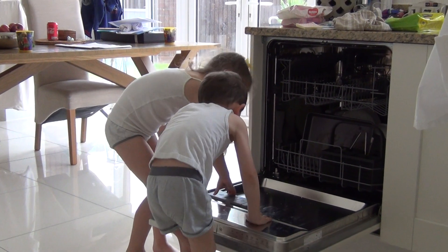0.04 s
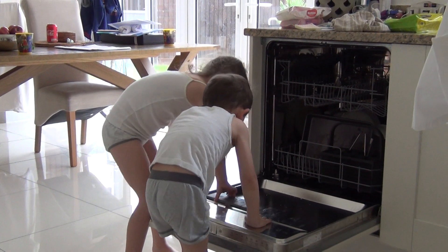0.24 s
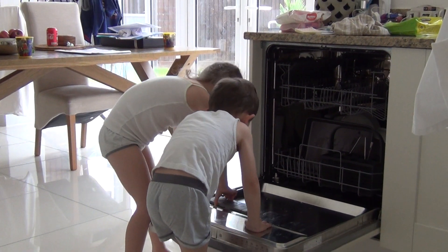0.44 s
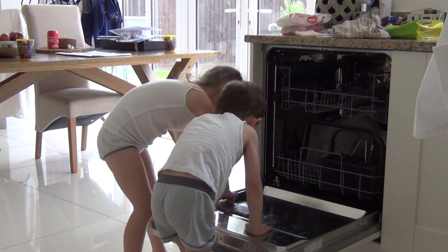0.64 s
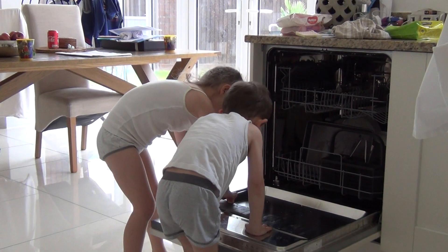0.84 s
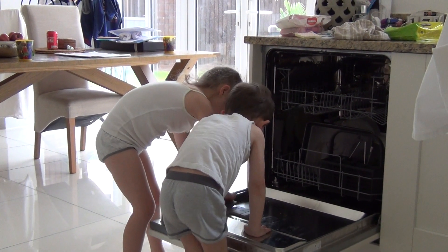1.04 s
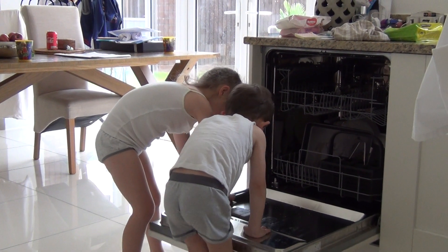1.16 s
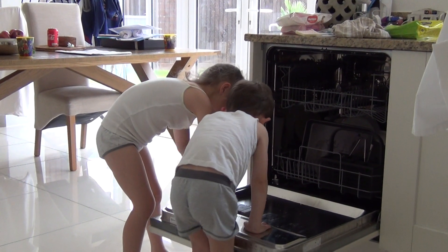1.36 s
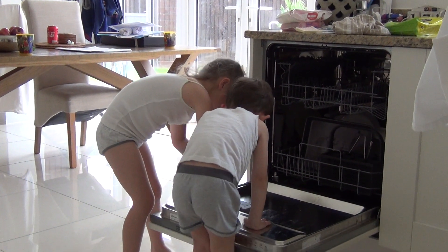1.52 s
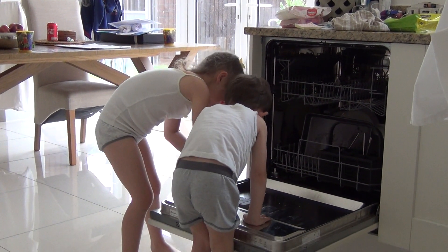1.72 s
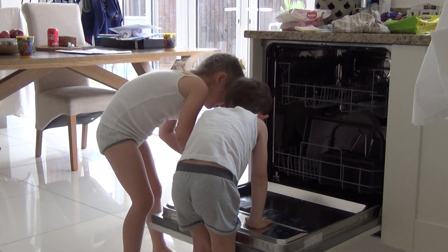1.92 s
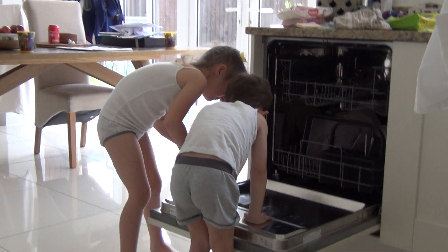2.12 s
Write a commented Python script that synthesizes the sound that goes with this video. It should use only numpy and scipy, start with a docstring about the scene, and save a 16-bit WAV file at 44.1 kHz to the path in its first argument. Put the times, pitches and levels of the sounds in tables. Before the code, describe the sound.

A plastic detergent flap clicks and snaps on an open dishwasher door. A faint hand scuff and soft knocks come first, with a light clink at 0.2 seconds. After a pause, hollow knocks and a click sound around 1.1 seconds, and a sharper click at 1.4. Soft knocks follow near 1.7. Just before 2 seconds, a loud clack rings the steel panel, echoing briefly in the quiet kitchen.

```python
"""A brief hand scuff, soft knocks, faint ticks and a light clink sound over quiet kitchen noise.
After a pause, hands at the detergent flap knock the hollow, open dishwasher door, and the plastic
catch clicks twice as it slips over its edge. Last, the flap snaps against its stop with a loud clack
that rings the steel panel. Each contact is a burst of noise coloured by the struck part; ringing
parts add decaying sine modes, and the tiled room reverberates."""
import sys
import numpy as np
from scipy import signal
from scipy.fft import rfft, irfft
from scipy.io import wavfile
from scipy.ndimage import uniform_filter1d

SR = 44100
rng = np.random.default_rng(int(sys.argv[2]) if len(sys.argv) > 2 else 0)


def materialize(psi):
    """Save the field psi as 16-bit PCM at rate SR to the path in sys.argv[1].

    A 1-D psi becomes a single channel; in a 2-D psi each row is a channel.
    """
    bounded = np.clip(np.atleast_2d(psi).T, -1, 1)
    quanta = np.round(bounded * 32767).astype(np.int16)
    wavfile.write(sys.argv[1], SR, quanta)


N = 96314
T = np.arange(N) / SR
F = np.maximum(np.arange(N + 1) * SR / (2 * N), 1)  # Hz, bins of a 2N-point FFT
OCTAVES = np.log2(F / 1000)  # re 1 kHz


def amp(db):
    """Decibels to gain."""
    return 10 ** (np.asarray(db) / 20)


def curve(points):
    """Rows of (f/Hz, value) interpolated over log frequency."""
    hz, value = np.array(points, float).T
    return np.interp(np.log(F), np.log(hz), value)


def resonances(peaks):
    """Bell-shaped peaks and dips in dB from rows of (f/Hz, width/Hz, gain/dB)."""
    return sum(db * .5 ** ((2 * (F - hz) / width_hz) ** 2) for hz, width_hz, db in peaks)


def colour(x, gain_db):
    """Minimum-phase filter, built by folding the cepstrum."""
    cepstrum = irfft(gain_db * np.log(10) / 20)
    cepstrum[1:N] *= 2
    cepstrum[N + 1:] = 0
    return irfft(rfft(x, 2 * N) * np.exp(rfft(cepstrum)))[..., :N]


def unit(x):
    """Scale to unit energy."""
    return x / np.sqrt(np.sum(x ** 2))


def noise(gain_db):
    """Steady coloured noise, rms 1."""
    return unit(colour(rng.standard_normal(N), gain_db)) * np.sqrt(N)


def fade(t60_s, t=T):
    """Exponential decay."""
    return np.exp(-np.log(1000) * t / t60_s)


def place(x, start_s, db):
    """Start a sound at start_s with the energy of 20 ms at level db."""
    return np.pad(unit(x), (int(start_s * SR), 0))[:N] * amp(db) * np.sqrt(.02 * SR)


def scatter(envelope):
    """Dense random vibration, alternately whitened and fitted to its envelope."""
    x = rng.standard_normal(N) * envelope
    for _ in range(4):
        spectrum = rfft(x)
        bin_power = np.abs(uniform_filter1d(np.abs(spectrum) ** 2, size=61))
        x = irfft(spectrum / np.sqrt(bin_power + 1e-12), N)
        local_power = np.abs(uniform_filter1d(x ** 2, size=301))
        x = x * envelope / np.sqrt(local_power + 1e-14)
    return unit(x)


def contact(shape_db, t60_s, rise_s, hold_s=0):
    """Burst of contact chatter, coloured by the struck part."""
    envelope = (1 - np.exp(-T / rise_s)) * fade(t60_s, np.maximum(T - hold_s, 0))
    return colour(scatter(envelope), shape_db)


def ring(modes, tilt_db_per_oct=0, damping=1, rise_s=0.0034):
    """Decaying modes of a struck part, in random phase."""
    ringing = np.zeros(N)
    for hz, db, t60_s in modes:
        gain = amp(db + tilt_db_per_oct * np.log2(hz / 1000))
        ringing += gain * fade(t60_s / damping) * np.sin(2 * np.pi * (hz * T + rng.random()))
    return (1 - np.exp(-T / rise_s)) * ringing


# stereo width: f/Hz, side gain/dB
SIDE_GAIN = [(50, 1.5), (150, -19.5), (800, -21.5), (2800, -18.5), (5500, -12.5), (9000, -6.5),
             (13000, -47)]

def stereo(mid, twin):
    """Left and right from a sound and a filtered, uncorrelated twin."""
    side = colour(twin, curve(SIDE_GAIN))
    return np.array([mid + side, mid - side])


# room noise spectrum: f/Hz, relative level/dB
AIR_SPECTRUM = [(25, -16.5), (60, -13), (120, -8.5), (240, -1.5), (320, -3.5), (480, -3.5), (800, -8.5),
                (1500, -13.5), (2500, -20.5), (3100, -27), (6400, -26.5), (8500, -32), (9700, -37),
                (10600, -30), (18000, -36)]
# steady tones: f/Hz, rms level/dB
HUM_TONES = [(100, -78.5), (452, -83), (2519, -83.5)]

def background(air_db=-62, whine_hz=15460, whine_db=-79):
    """Quiet room noise with a faint hum and a thin, wavering whine."""
    air = stereo(noise(curve(AIR_SPECTRUM)), noise(curve(AIR_SPECTRUM))) * amp(air_db)
    hum = sum(amp(db) * np.sin(2 * np.pi * hz * T) for hz, db in HUM_TONES)
    waver = 1 + .35 * noise(-20 * np.log10(1 + (F / 70) ** 2))  # mostly below 70 Hz
    whine = amp(whine_db) * waver * np.sin(2 * np.pi * whine_hz * T)
    return air + np.sqrt(2) * (hum + whine)


# kitchen reverberation: f/Hz, t60/s
ROOM_DECAY = [(120, 0.37), (400, 0.5), (1000, 0.47), (2200, 0.52), (4500, 0.46), (8000, 0.35),
              (12000, 0.24), (17000, 0.24)]

def room_tail(gap_s=0.0023, build_s=0.0027):
    """Diffuse echoes off tiles and cupboards; the treble dies first."""
    hz, t60s = np.array(ROOM_DECAY).T
    build_up = 1 - np.exp(-np.maximum(T - gap_s, 0) / build_s)
    spectrum = rfft(scatter(fade(t60s.max()) * build_up), 2 * N)
    tail = np.zeros(N)
    for weights, t60_s in zip(np.eye(len(hz)), t60s):
        band = irfft(spectrum * np.interp(np.log(F), np.log(hz), weights))[:N]
        tail += band * fade(t60_s) / fade(t60s.max())
    return tail


def kitchen(direct, room_db):
    """Direct sound plus stereo reverberation."""
    echoes = signal.fftconvolve(stereo(room_tail(), room_tail()), direct[None], axes=1)[:, :N]
    return direct + amp(room_db) * echoes


# hand friction spectrum: f/Hz, relative level/dB
SCUFF_SPECTRUM = [(150, -2.5), (600, -6), (1300, -1), (2500, -7.5), (3700, -3.5), (4600, -0.5),
                  (5600, -10.5), (9000, -13), (17000, -21)]

def scuff(level_db=-58, stop_s=0.027, tau_s=0.065):
    """A hand slides briefly along the door; the sound dies away."""
    envelope = amp(level_db) * np.exp(-np.maximum(T - stop_s, 0) / tau_s)
    return envelope * stereo(noise(curve(SCUFF_SPECTRUM)), noise(curve(SCUFF_SPECTRUM)))


# faint ticks: t/s, level/dB
TICK_HITS = [(0.053, -65), (0.0579, -61), (.159, -67), (.171, -73), (1.347, -74.5), (2.0699, -50)]
# tick spectrum: f/Hz, relative level/dB
TICK_SPECTRUM = [(500, 4), (4000, -12), (8000, -4.5), (12000, -10), (18000, -28)]

def ticks():
    """Faint, short contacts in the room."""
    bursts = sum(place(contact(curve(TICK_SPECTRUM), t60_s=0.033, rise_s=0.00055), start_s, db)
                 for start_s, db in TICK_HITS)
    return kitchen(bursts, room_db=-4)


# clink contact spectrum: f/Hz, relative level/dB
CLINK_SPECTRUM = [(500, -27), (2100, -14), (2800, 1), (3700, 2), (4400, -9.5), (6000, -20), (8500, -11),
                  (11000, -25), (18000, -34)]
# clink modes: f/Hz, relative level/dB, t60/s
CLINK_RING = [(2600, -9, 0.65), (2910, -17, .45), (3130, -16, .3), (3400, -3, 0.27), (3450, -9, 0.26),
              (3590, 4, .25), (3850, -5, 0.24)]

def clink(start_s=.2095):
    """A light contact that rings in a narrow treble band."""
    tap = place(contact(curve(CLINK_SPECTRUM), t60_s=0.063, rise_s=0.0002), start_s, db=-53)
    return kitchen(tap, room_db=-1.5) + place(ring(CLINK_RING), start_s, db=-59)


# snick spectrum: f/Hz, relative level/dB
SNICK_SPECTRUM = [(200, -16), (800, -8), (1400, 8.5), (2200, 3), (3500, -3.5), (8000, -11.5), (11500, 1),
                  (14500, 0), (18000, -11)]

def snick():
    """One sharp, close contact without reverberation."""
    return place(contact(curve(SNICK_SPECTRUM), t60_s=0.0017, rise_s=.00005), start_s=1.8294, db=-49)


# knocks: t/s, level/dB, tilt/(dB/oct), shelf above 3 kHz/dB
KNOCK_HITS = [(0.051, -60.5, -2.5, 10), (0.075, -70, -6, -2), (1.118, -52.5, 1, 5), (1.1227, -43.5, 0, -6),
              (1.139, -41.5, 1, -30), (1.7207, -51.5, 3, 3.5), (1.730, -51, 0, 0.5), (1.941, -53.5, 2, 4)]
# knock spectrum: f/Hz, relative level/dB
KNOCK_SPECTRUM = [(60, -10.5), (130, -4.5), (250, 4.5), (420, -12.5), (600, -0.5), (850, -5.5),
                  (1200, -6.5), (1750, -8), (2600, -16.5), (8000, -30), (12000, -35.5), (17000, -54)]
# hollow door resonances: f/Hz, width/Hz, gain/dB
CAVITY_PEAKS = [(255, 65, 4.5), (385, 62, 10), (562, 73, 4), (1090, 170, 3.5), (1430, 160, 1),
                (1744, 130, 5), (3280, 260, 4)]
# steel panel modes, also rung by the flap: f/Hz, relative level/dB, t60/s
PANEL_MODES = [(171, -7, 0.32), (200, -33, 0.11), (253, -1, 0.59), (381, 7.5, 0.36), (458, 2, 0.21),
               (577.4, 1, 0.45), (664, 0, 0.21), (852, -10, 0.74), (1275, 6, 0.14), (1590, 3, 0.38),
               (1960, -10, 0.95), (2094, 3, 0.49), (2116, 1, 0.29), (2220, 4, 0.54)]

def door_knocks(hand_damping=1.23):
    """Dull knocks on the hollow door; the panel's ring dies faster under a hand."""
    door_db = curve(KNOCK_SPECTRUM) + resonances(CAVITY_PEAKS)
    shelf = 1 / (1 + (3000 / F) ** 6)
    blows = np.zeros(N)
    for start_s, db, tilt, shelf_db in KNOCK_HITS:
        shape_db = door_db + tilt * OCTAVES + shelf_db * shelf
        blows += place(contact(shape_db, t60_s=.05, rise_s=.002), start_s, db)
    panel = sum(place(ring(PANEL_MODES, tilt_db_per_oct=-6, damping=hand_damping), start_s, db - 5)
                for start_s, db, _, _ in KNOCK_HITS)
    return kitchen(blows, room_db=0.5) + panel


# catch clicks: t/s, level/dB, tilt/(dB/oct), ring re click/dB
CATCH_HITS = [(1.1505, -42.5, 3.5, -6), (1.431, -36.5, 0.5, -3.5)]
# click spectrum: f/Hz, relative level/dB
CATCH_SPECTRUM = [(80, -15), (200, -0.5), (420, -0.5), (700, 9.5), (1000, -5), (1500, -1), (2600, -6),
                  (3400, -5), (4800, -9), (7000, -9.5), (10500, -10), (13000, -13.5), (18000, -23.5)]
# catch resonances: f/Hz, width/Hz, gain/dB
CATCH_PEAKS = [(3030, 180, 7), (3570, 230, 3), (3930, 220, 3.5), (5400, 410, 2.5), (5880, 230, 4.5),
               (6730, 350, 7.5), (7420, 450, 5), (8790, 280, 9.5), (9440, 310, 8), (10500, 550, 7),
               (11380, 240, 9.5), (12100, 300, 8), (14600, 550, 9)]
# catch modes: f/Hz, relative level/dB, t60/s
CATCH_RING = [(598, -3.5, 0.35), (668, -10, .25), (743, -5, 0.46), (1556, -5.5, 0.25), (2208, -4.5, 0.16),
              (3490, -4.5, 0.15), (4050, -3, 0.1), (5330, -7, 0.16), (6560, -10, 0.15), (7640, -18, .26),
              (9350, 2, 0.089)]

def catch_clicks():
    """The plastic catch slips over its edge and rings."""
    catch_db = curve(CATCH_SPECTRUM) + resonances(CATCH_PEAKS)
    clicks = sum(place(contact(catch_db + tilt * OCTAVES, t60_s=0.086, rise_s=0.0015), start_s, db)
                 for start_s, db, tilt, _ in CATCH_HITS)
    body = sum(place(ring(CATCH_RING), start_s, db + ring_db) for start_s, db, _, ring_db in CATCH_HITS)
    return kitchen(clicks, room_db=-0.5) + body


# snap and rebound: t/s, level/dB, tilt/(dB/oct)
FLAP_HITS = [(1.952, -23.5, 0.5), (1.9595, -28.5, -3)]
# clack spectrum: f/Hz, relative level/dB
FLAP_SPECTRUM = [(50, -40), (120, -12.5), (180, 0.5), (450, 0), (800, 0), (1250, -1.5), (1800, -2),
                 (2150, -3.5), (2700, -7), (4200, -12), (6000, -8), (10000, -8.5), (12000, -11),
                 (18000, -29.5)]
# plastic flap peaks and dips: f/Hz, width/Hz, gain/dB
FLAP_PEAKS = [(1057, 44, 2.5), (1200, 84, 2.5), (1423, 41, -8), (1756, 116, -7), (2054, 220, 6),
              (2244, 260, 5.5), (2650, 170, -1), (3420, 800, 5.5), (4670, 570, 6.5), (5900, 330, 6),
              (7460, 400, 0.5), (8730, 540, 3), (9650, 950, 3.5), (10430, 330, 3)]

def flap_clack():
    """The flap hits its stop, rebounds and sets the steel panel ringing."""
    flap_db = curve(FLAP_SPECTRUM) + resonances(FLAP_PEAKS)
    blows = np.zeros(N)
    for start_s, db, tilt in FLAP_HITS:
        blow = contact(flap_db + tilt * OCTAVES, t60_s=0.062, rise_s=0.00042, hold_s=0.0036)
        blows += place(blow, start_s, db)
    snap_s, snap_db, _ = FLAP_HITS[0]
    return kitchen(blows, room_db=2.5) + place(ring(PANEL_MODES), snap_s, snap_db - 2.5)


def scene():
    """All sources, slightly left of centre."""
    mix = flap_clack() + catch_clicks() + door_knocks() + ticks() + clink() + snick()
    mix += scuff() + background()
    return mix * amp([[.3], [-.3]])


def record(dry):
    """Steep low-pass at 19.1 kHz."""
    return signal.sosfilt(signal.ellip(10, .2, 70, 19100, fs=SR, output="sos"), dry)


dry = scene()
out = record(dry)
materialize(out)
```